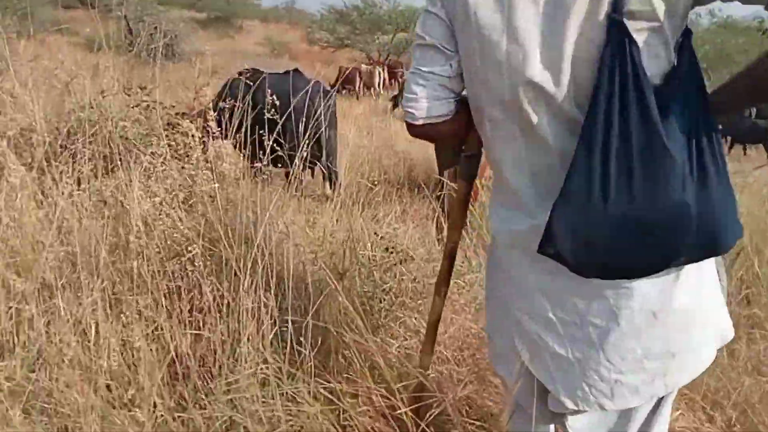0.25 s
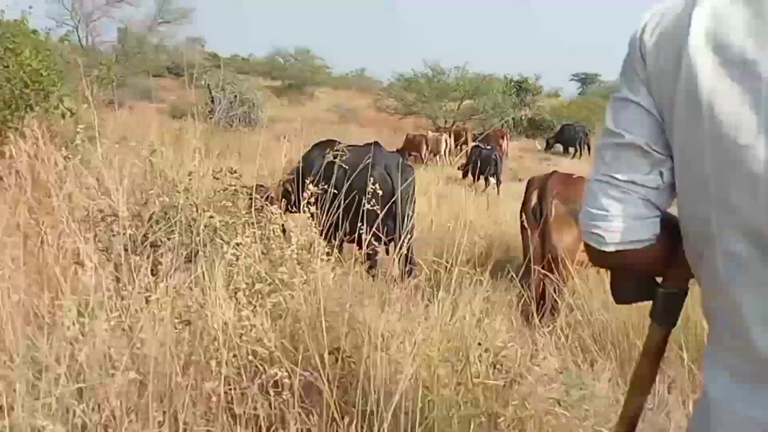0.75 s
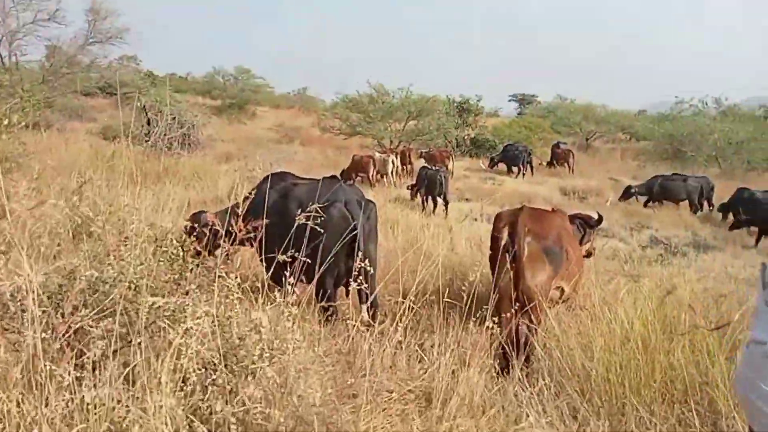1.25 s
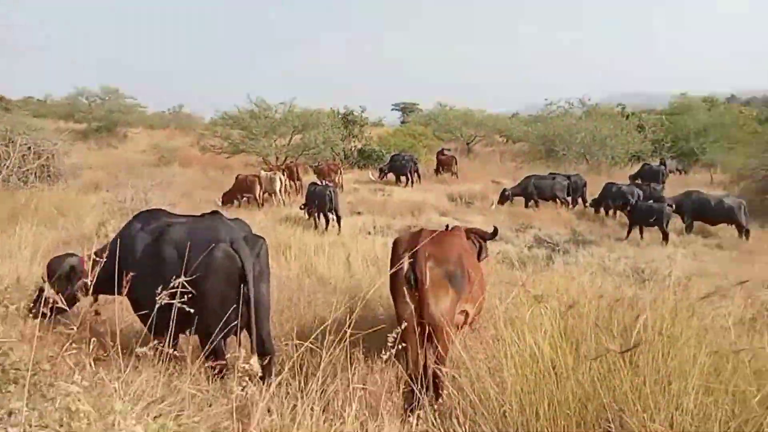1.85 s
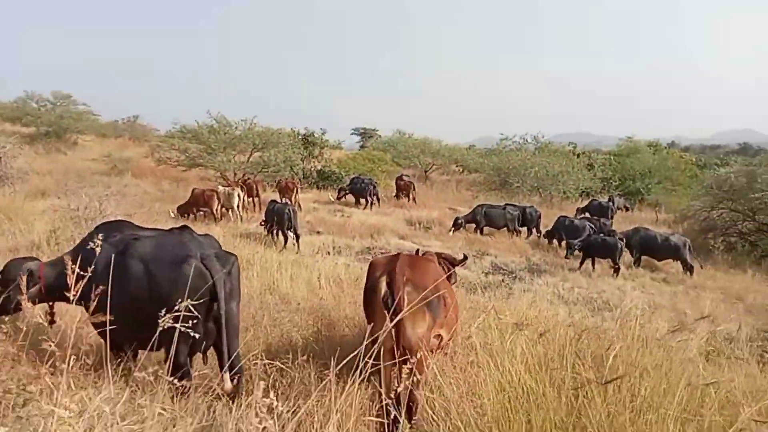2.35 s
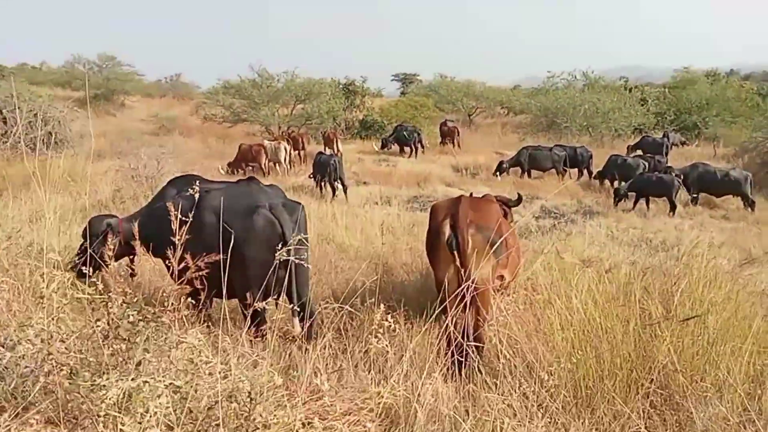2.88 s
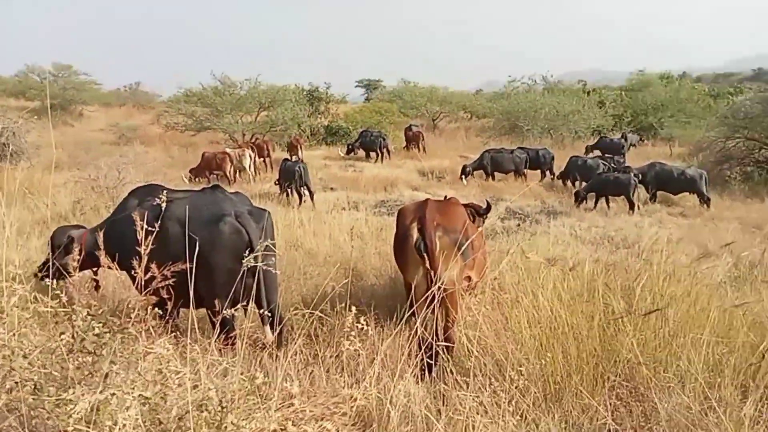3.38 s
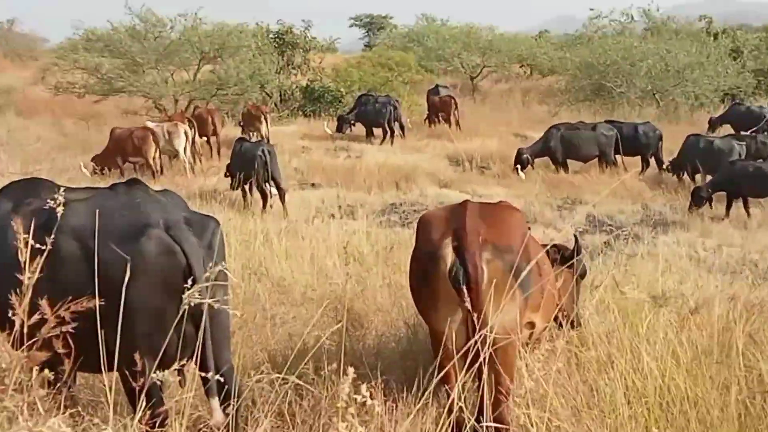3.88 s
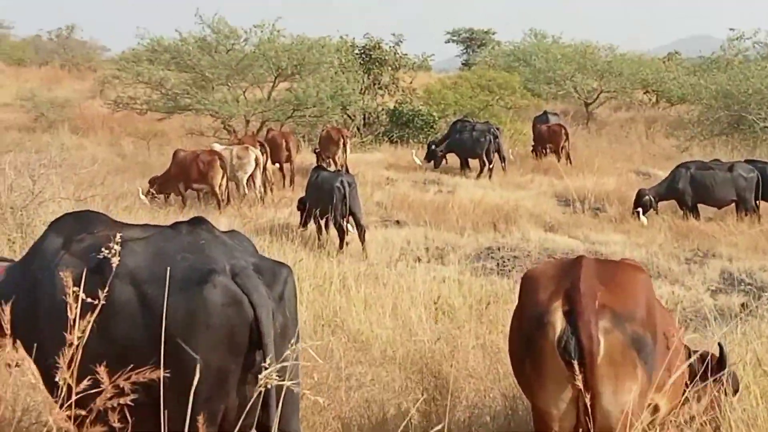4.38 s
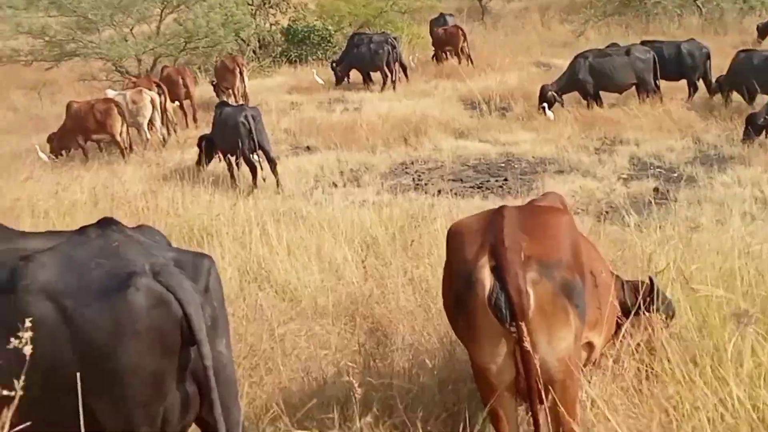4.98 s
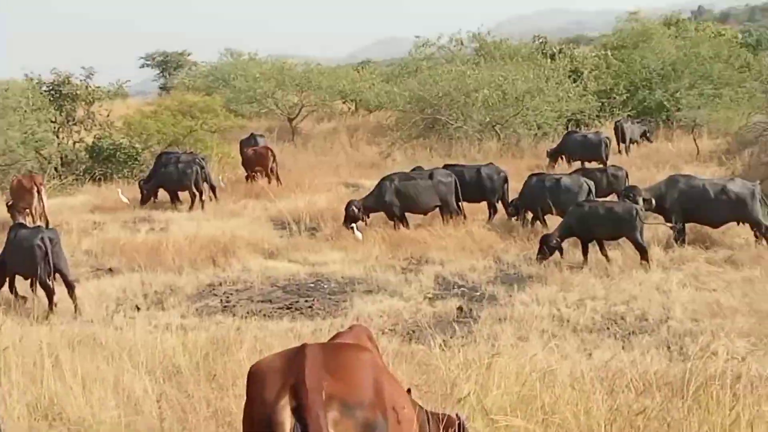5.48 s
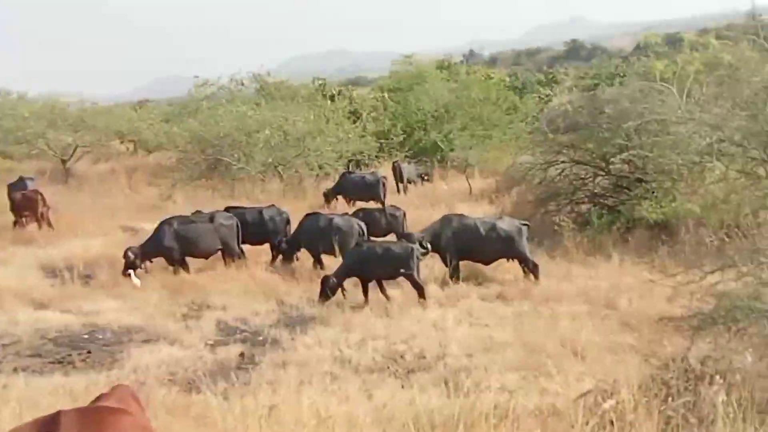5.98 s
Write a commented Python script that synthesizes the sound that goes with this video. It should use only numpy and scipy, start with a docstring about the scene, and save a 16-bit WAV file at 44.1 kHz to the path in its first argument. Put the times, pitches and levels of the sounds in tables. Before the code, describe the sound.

Someone wades slowly through tall dry grass, bright rustling swelling with each push, with stem crunches, sharp straw snaps and a steady outdoor hiss.

```python
"""Someone wades slowly through tall dry grass, close to a hand-held microphone, for six seconds. From the
start, many tiny random clicks, coloured or set ringing, make a rustle that swells with each push. Under it lie
dull crackle, low rumble and steady hiss; soft bumps of a few low cycles come now and then. Soon stems crunch
and seed heads squeal, as runs of ringing cracks, and stems knock, as dying low tones. From just before the
first second on, single straws snap as very short bright bursts."""
import sys
import numpy as np
from scipy import signal
from scipy.fft import rfft, irfft
from scipy.io import wavfile
from scipy.ndimage import uniform_filter1d

SR = 44100
rng = np.random.default_rng(int(sys.argv[2]) if len(sys.argv) > 2 else 0)


def inscribe(sig):
    """Save sig as 16-bit PCM at rate SR to the path in sys.argv[1].

    A 1-D sig is mono; a 2-D sig holds one channel per row.
    Samples are clipped to [-1, 1] before scaling.
    """
    pcm = np.round(np.clip(np.atleast_2d(sig).T, -1, 1) * 32767)
    wavfile.write(sys.argv[1], SR, pcm.astype(np.int16))


N = 274743
TIME = np.arange(N) / SR  # seconds


def gain_of(db):
    """Turns decibels into an amplitude factor."""
    return 10 ** (np.asarray(db) / 20)


def evened(x):
    """Scales to rms 1."""
    return x / np.sqrt(np.mean(x ** 2) + 1e-20)


def curve(rows, axis):
    """Joins the points of one table column by straight lines, giving a value at every sample."""
    rows = np.array(rows)
    return np.interp(TIME, rows[:, 0], rows[:, axis])


def add(mix, s, sound):
    """Mixes a sound in from s seconds on, cut off where the mix ends."""
    part = mix[max(round(s * SR), 0):][:len(sound)]
    part += sound[:len(part)]


def colour(x, points):
    """Filters x by a curve of dB over frequency, then scales it to rms 1."""
    hz, db = np.transpose(points)
    f = np.fft.rfftfreq(len(x), 1 / SR)
    filter_db = np.interp(np.log(f + 1), np.log(hz), db)
    return evened(irfft(rfft(x) * gain_of(filter_db), len(x)))


def resonate(x, hz, width):
    """A resonance, width in Hz, whose pitch may move: shift it to 0 Hz, smooth, shift it back."""
    turn = np.exp(2j * np.pi * np.cumsum(hz * np.ones(len(x))) / SR)
    r = np.exp(-np.pi * width / SR)
    smoothed = signal.lfilter([1 - r], [1, -r], x / turn + 1e-18)
    return 2 * (turn * smoothed).real


def resonate_twice(x, hz, width):
    """Two equal resonances in a row, which fall off more steeply on both sides."""
    return resonate(resonate(x, hz, width), hz, width)


def wander(rate):
    """Slow random ups and downs at rms 1, weaker and weaker above the rate in Hz."""
    f = np.fft.rfftfreq(N, 1 / SR)
    return evened(irfft(rfft(rng.standard_normal(N)) / (1 + (f / rate) ** 2), N))


def slips(per_s, spread_db, wash):
    """Tiny stick-slip clicks of uneven size over a blur of farther ones, which is noise."""
    strain = np.minimum(rng.exponential(1, N), 3.2)  # capped: a blade holds only so much strain
    size = gain_of(spread_db * strain)
    clicks = size * rng.choice([-1, 1], N) * (rng.random(N) < per_s / SR)
    return evened(evened(clicks) + wash * rng.standard_normal(N))


def swell(s, db, rise, fall):
    """The power of one effort, which builds up to its height at s and dies away."""
    away = np.maximum((s - TIME) / rise, (TIME - s) / fall)
    shape = 1.5  # 1 is a pointed swell, 2 a round one
    return gain_of(db) ** 2 * np.exp(-abs(away) ** shape)


def effort():
    """Levels in dB of blades, seed heads and stems: the power of pushes adds to steady brushing."""
    # grass that keeps brushing the walker between pushes; levels before the trims in rustle():
    # [t/s, blades level/dB, seed heads against blades level/dB, stems against blades level/dB]
    brushing = [(0, -39, -3, -9.5), (.4, -42.5, -3.5, -8), (.62, -39.5, -8, -11), (1.12, -40, -1.5, -8.5),
                (1.55, -39, -5.5, -8.5), (1.83, -44, 1.5, -6.5), (2.2, -42, 1.5, -7),
                (2.65, -44.5, 0.5, -7.5), (3.2, -49, 1.5, -3), (3.65, -43.5, -4, -6),
                (3.98, -48.5, -5, -3.5), (4.48, -43, -7, -12), (4.72, -38.5, -5, -8),
                (5.08, -35.5, -6, -10.5), (5.31, -40.5, -4, -13.5), (5.44, -42.5, 0, -11.5),
                (5.7, -41, -3, -14.5), (6.06, -44, -0.5, -11), (6.23, -40, -4, -6)]
    # pushes of legs and stick through the grass; levels before the same trims: [t/s at the height,
    # blades level/dB, rise/s, fall/s, seed heads against blades level/dB, stems against blades level/dB]
    pushes = [(.11, -42, 0.039, 0.028, -7, -4), (.68, -40.5, .025, 0.033, -14, -9.5),
              (.935, -36.5, 0.075, 0.056, 3.5, -5.5), (1.28, -37.5, .07, .025, -3, -5.5),
              (1.43, -49, 0.025, 0.052, -1, -7), (1.77, -35.5, 0.052, .018, 1.5, -13),
              (1.92, -46, 0.043, 0.074, -1, 2), (2.15, -46, 0.058, 0.023, 0, -1),
              (2.31, -44, 0.028, 0.035, 2, -3), (2.455, -33.5, 0.047, 0.035, 0, -9.5),
              (2.5, -34.5, 0.031, 0.032, 1, -9.5), (2.72, -56, 0.027, 0.069, -5, 5),
              (3.3, -49.5, 0.031, 0.056, 0, -1), (3.61, -44, 0.049, 0.039, -1, -5),
              (3.895, -43.5, 0.048, 0.018, -6, -2), (4.04, -43, 0.035, 0.032, -9, -7),
              (4.24, -41.5, .025, 0.043, -16, -2.5), (4.34, -43, .02, .03, -12, -4),
              (4.43, -42, 0.027, 0.016, -9, -2.5), (4.6, -39, 0.056, 0.055, -.5, -6.5),
              (4.86, -39, 0.054, .12, 4, -2.5), (5.24, -39.5, .08, 0.041, -8, -8),
              (5.368, -34, 0.016, 0.018, -15, -6.5), (5.56, -44, 0.067, .06, 3.5, -1),
              (5.85, -43, 0.11, 0.11, 5, 0), (6.175, -37, 0.026, 0.023, -2, -10)]
    blades_db = curve(brushing, axis=1)
    heads_db = blades_db + curve(brushing, axis=2)
    stems_db = blades_db + curve(brushing, axis=3)
    power = gain_of([blades_db, heads_db, stems_db]) ** 2
    for s, db, rise, fall, heads_offset_db, stems_offset_db in pushes:
        shares = gain_of([[0], [heads_offset_db], [stems_offset_db]]) ** 2
        power += shares * swell(s, db, rise, fall)
    return 10 * np.log10(power)


def drift(x, depth_db):
    """Ever different stems touch, so patches of the colour come and go."""
    z = signal.stft(x, nperseg=1024)[2]
    patches = rng.standard_normal(z.shape)
    for _ in range(2):
        patches = uniform_filter1d(patches, size=4, axis=0)  # smooth over frequency
        patches = uniform_filter1d(patches, size=5, axis=1)  # smooth over time
    return signal.istft(z * gain_of(depth_db * evened(patches)), nperseg=1024)[1][:N]


def rustle():
    """Blades, seed heads, stalks and straw catch and slip in shared clumps."""
    # how the grass in contact rings:
    # [t/s, blade f/Hz, stalk f/Hz, share of clear ring against broad scrape (0 to 1)]
    ringing = [(0, 9500, 5700, 0.17), (.95, 9650, 5730, .4), (1.55, 9140, 5860, 0.7), (1.95, 9600, 5650, 0),
               (2.48, 9120, 5530, 1), (3.6, 9500, 5630, 0.54), (4.1, 9000, 5550, 0.4),
               (4.9, 9300, 5430, .45), (5.33, 8630, 4940, 0.7), (5.8, 10100, 5060, 0.36),
               (6.23, 9300, 5230, .6)]
    # colours of scraping blades, seed heads and coarse straw: [f/Hz, relative level/dB]
    blade_colour = [(3500, -28), (6000, -18), (7200, -5), (8400, -4), (9700, -5.5), (11000, -4.5),
                    (12500, -9), (16000, -16)]
    head_colour = [(7000, -27), (10000, -2.5), (11800, -2), (13200, 0.5), (14500, -0.5), (16000, -0.5)]
    straw_colour = [(500, -18.5), (1200, -7), (2000, -1.5), (3000, -1), (4000, -1.5), (5000, -2),
                    (7000, -11), (13000, -24)]
    clumps = wander(rate=22)
    contact = slips(per_s=3200, spread_db=-0.5, wash=0.77)
    blade_hz, stalk_hz = curve(ringing, axis=1), curve(ringing, axis=2)
    clear = np.clip(curve(ringing, axis=3), 0, 1)

    ring = evened(resonate_twice(contact, blade_hz, width=2000))
    scrape = colour(slips(per_s=3000, spread_db=-0.5, wash=1.0), blade_colour)
    blades = np.sqrt(clear) * ring + np.sqrt(1 - clear) * scrape
    # seed heads partly share the clicks of the blades
    heads = colour(0.5 * contact + slips(per_s=2800, spread_db=3.5, wash=0.75), head_colour)
    stalk_slips = slips(per_s=3000, spread_db=3.5, wash=0.99)
    stalks = evened(resonate_twice(stalk_slips, stalk_hz, width=2170))
    straw = colour(slips(per_s=1500, spread_db=3.0, wash=1.0), straw_colour)

    blades_db, heads_db, stems_db = effort()
    straw_db = -20 + 0.66 * stems_db  # coarse straw follows the stems, but less steeply
    blades = blades * gain_of(blades_db - 1.42 + 0.42 * clumps + 0.63 * wander(rate=21))
    heads = heads * gain_of(heads_db + 1.25 + 1.0 * clumps)
    stalks = stalks * gain_of(stems_db - 1.5 + 0.53 * clumps)
    straw = straw * gain_of(straw_db + 0.47 * clumps)
    return drift(blades + heads + stalks + straw, depth_db=1.9)


def stem_ticks(per_s, t60):
    """Many stems of different lengths, each ticking once at a random time and its own pitch."""
    t, out = np.arange(SR // 12) / SR, np.zeros(N)
    for hz in np.geomspace(220, 1700, round(per_s * N / SR)):
        when, size = rng.random(), rng.uniform(0.69, 1)
        tick = np.sin(2 * np.pi * hz * t) * gain_of(-60 * t / t60)  # falls 60 dB in t60 seconds
        add(out, when * N / SR, size * tick)
    return evened(out)


def tread():
    """The mat of old straw crackles dully as weight settles on it."""
    # colour of the matted straw: [f/Hz, relative level/dB]
    mat_colour = [(60, -24), (170, 5.5), (300, -7), (600, 5.5), (1100, 0.5), (1800, -0.5), (3500, -13),
                  (8000, -29)]
    # weight settling on the straw, level before a small trim: [t/s at the height, level/dB, rise/s, fall/s]
    treads = [(.14, -57.5, 0.073, 0.093), (.32, -60, .06, 0.054), (.78, -55.5, 0.059, 0.069),
              (.95, -55.5, 0.077, 0.11), (1.28, -57.5, 0.074, .06), (1.52, -59, 0.033, .04),
              (1.86, -56.5, 0.089, 0.074), (2.42, -59, 0.051, .08), (2.9, -61.5, 0.17, 0.053),
              (3.5, -57.5, 0.12, 0.19), (4.24, -57.5, 0.071, 0.12), (4.76, -51, 0.16, .1),
              (5.17, -59, .12, 0.1), (5.83, -62, .2, 0.062), (6.22, -55.5, 0.11, .08)]
    crackle = colour(slips(per_s=700, spread_db=1.0, wash=0.8), mat_colour)
    mat = evened(crackle + 0.78 * stem_ticks(per_s=55, t60=0.11))
    rest_power = gain_of(-66.5) ** 2  # what stays between treads
    weight = np.sqrt(rest_power + sum(swell(*row) for row in treads))
    return mat * weight * gain_of(-0.5 + 0.43 * wander(rate=47))


def handling_rumble():
    """Low rumble at the hand-held microphone: deep noise that rises and sinks."""
    # colour of the rumble: [f/Hz, relative level/dB]
    rumble_colour = [(20, -34), (35, -21), (55, -4), (85, 3), (130, 0), (200, -1), (400, -6), (1500, -53)]
    # strength of the rumble, before a 1.5 dB cut: [t/s, level/dB]
    handling = [(0, -61), (.28, -60.5), (.48, -70), (1.05, -72), (1.3, -84), (2.2, -79), (2.38, -62),
                (2.6, -72), (3.15, -69), (3.65, -60.5), (3.95, -63), (4.2, -58), (4.5, -61.5),
                (4.78, -57.5), (5.05, -59.5), (5.3, -66), (5.6, -61.5), (6.23, -59)]
    rumble = colour(rng.standard_normal(N), rumble_colour)
    return rumble * gain_of(curve(handling, axis=1) - 1.5)


def field_air():
    """The steady hiss of the field: coloured noise at one level."""
    # colour of the hiss: [f/Hz, relative level/dB]
    air_colour = [(25, -37), (80, -4), (160, -3.5), (400, -7.5), (1000, -15.5), (2200, -0.5), (4000, -8.5),
                  (6700, 2.5), (9300, 10), (15500, -8)]
    return gain_of(-47.5) * colour(rng.standard_normal(N), air_colour)


def bumps():
    """Soft bumps of footfalls and handling: each is a few uneven low cycles that swell and fade."""
    # bumps, peak before a 1 dB cut, pitch before it wavers, length before it is stretched 1.4 times:
    # [t/s at the middle, peak level/dB, f/Hz, length/s]
    soft_bumps = [(.008, -39.5, 96, .018), (0.096, -46, 121, .06), (0.179, -37.5, 114, 0.018),
                  (0.214, -48, 88, 0.06), (1.044, -53, 97, 0.06), (1.286, -50, 172, .031),
                  (3.5, -48, 78, 0.03), (4.274, -42.5, 92, 0.07), (4.838, -41.5, 122, .053),
                  (5.011, -38, 133, 0.027), (5.059, -45, 92, .06), (5.417, -51, 74.5, 0.043),
                  (5.806, -38.5, 127, 0.021), (5.965, -46, 88, .033), (6.14, -40.5, 99, .035)]
    out, sway = np.zeros(N), wander(rate=100)
    for s, db, hz, length in soft_bumps:
        pitch = hz * np.exp(0.333 * sway[round(s * SR):][:round(1.4 * length * SR)])
        cycles = np.cumsum(pitch) / SR + rng.random()
        push = np.sin(2 * np.pi * cycles) * np.hanning(len(pitch))
        add(out, s - len(push) / SR / 2, gain_of(db - 1.0) * push)
    return out


def crunches():
    """Stems crunch or scrape, and seed heads squeal, in quick runs of cracks, each rung by a resonance."""
    # runs of cracks, level before fading in and out and a 0.95 dB cut, length before it is stretched
    # 1.5 times, width of each of two resonances: [t/s at the middle, rms level/dB, f/Hz, width/Hz, length/s]
    runs = [(0.101, -44, 3000, 2200, 0.0073), (.672, -41, 15100, 1800, 0.22),
            (1.28, -43.5, 1110, 1800, 0.02), (1.336, -48.5, 1190, 250, 0.04), (1.754, -50, 930, 600, .023),
            (1.772, -49, 1590, 1500, 0.058), (1.976, -39, 12400, 1000, 0.027),
            (2.186, -38.5, 8300, 2500, .02), (2.181, -44, 3330, 2200, 0.023),
            (2.502, -43, 1580, 1400, .034), (2.488, -40, 890, 700, 0.029), (3.573, -54.5, 363, 170, .13),
            (3.591, -51.5, 1250, 500, 0.025), (3.876, -51, 690, 900, 0.056),
            (4.222, -55.5, 1180, 200, 0.06), (4.419, -38.5, 5400, 900, 0.032),
            (4.431, -45.5, 1810, 1500, .029), (4.746, -51.5, 377, 443, 0.11), (4.759, -42, 700, 1800, .015),
            (4.844, -38.5, 3000, 2200, 0.022), (4.85, -54, 500, 1500, 0.059),
            (5.371, -44.5, 3180, 3500, .035), (5.824, -53.5, 656, 500, 0.057),
            (6.023, -46.5, 744, 1100, 0.012)]
    out = np.zeros(N)
    cracks = slips(per_s=830, spread_db=6.5, wash=0.59)
    for s, db, hz, width, length in runs:
        run = cracks[round(s * SR):][:round(1.5 * length * SR)]
        run = evened(resonate_twice(run, hz, width)) * np.hanning(len(run))
        add(out, s - len(run) / SR / 2, gain_of(db - 0.95) * run)
    return out


def struck(hz, t60, width):
    """A brief burst of noise, dying 60 dB in t60 seconds, rings a stem; scaled to peak 1."""
    t = np.arange(SR // 10) / SR
    burst = rng.standard_normal(len(t)) * gain_of(-60 * t / t60)
    ring = resonate_twice(burst, hz, width)
    return ring / abs(ring).max()


def knocks():
    """Dull knocks of thick stems and stones: a dying tone with a little struck noise."""
    # knocks, level before a 5 dB cut and the mix of tone and noise:
    # [t/s, level/dB, ring f/Hz, time to fall 60 dB/s]
    dull_knocks = [(0.1013, -32.5, 890, 0.038), (.258, -37.5, 695, 0.041), (3.444, -35, 370, 0.063),
                   (3.478, -37, 1060, 0.022), (3.526, -38, 406, 0.042), (3.634, -36, 1240, 0.033),
                   (4.5814, -24.5, 1000, .018), (4.6033, -32, 1170, 0.029), (4.621, -28.5, 1080, 0.028),
                   (5.191, -32.5, 463, .025), (5.842, -35, 656, 0.023), (6.02, -41, 330, 0.034)]
    out, t = np.zeros(N), np.arange(SR // 10) / SR
    for s, db, hz, t60 in dull_knocks:
        mode = np.sin(2 * np.pi * hz * t) * gain_of(-60 * t / t60)
        knock = mode * (0.64 + 0.3 * np.exp(-t * hz / 2.5))  # the blow itself lifts the first cycles
        add(out, s, gain_of(db - 5.0) * (knock + 0.2 * struck(hz, t60, width=1.5 * hz)))
    return out


def snaps():
    """Single straws snap: very short bright bursts, each ringing at its own pitch."""
    # snapping straws, peak before a 1 dB cut: [t/s, peak level/dB, ring f/Hz, time for the burst to fall 60 dB/s]
    straw_snaps = [(.913, -21, 11000, .008), (1.279, -23, 9900, .012), (1.9676, -15.5, 12400, .0035),
                   (2.2313, -24, 9400, .008), (2.4377, -19.5, 9700, .004), (2.4757, -18, 9600, .009),
                   (2.8106, -24, 9100, .017), (3.322, -27, 9700, .015), (3.527, -23, 9100, .012),
                   (4.0358, -30, 9400, .008), (4.1123, -27, 9500, .01), (4.3451, -26, 9100, .012),
                   (4.6277, -25, 9300, .008), (4.844, -19, 8400, .014), (4.858, -22, 10400, .007),
                   (5.134, -20, 8600, .004), (5.3613, -21, 9100, .01), (5.372, -24, 9100, .012),
                   (5.398, -23.5, 5330, .0044), (5.445, -31, 4000, .004), (5.598, -24, 6460, .005),
                   (6.1251, -21, 8900, .013), (6.175, -19.5, 9200, .01)]
    out = np.zeros(N)
    for s, db, hz, t60 in straw_snaps:
        add(out, s, gain_of(db - 1.0) * struck(hz, t60, width=2600))
    return out


def scene():
    """The near grass over the steady hiss of the field, all in the middle."""
    ground = tread() + handling_rumble() + field_air()
    near = rustle() + ground + bumps() + crunches() + knocks() + snaps()
    return np.array([near, near])


def record(dry):
    """The microphone thins the deep bass; then the recorder's band limit cuts the highest treble."""
    thinned = signal.sosfilt(signal.butter(2, 42, "highpass", fs=SR, output="sos"), dry)
    edge_hz = 15600
    band_limit = signal.firwin(511, edge_hz, window=("kaiser", 9), fs=SR)
    return signal.oaconvolve(thinned, band_limit[None], "same")


dry = scene()
out = record(dry)
inscribe(out)
```